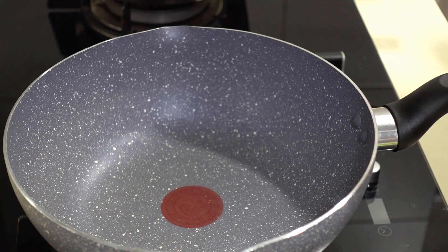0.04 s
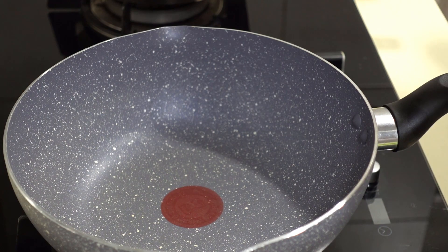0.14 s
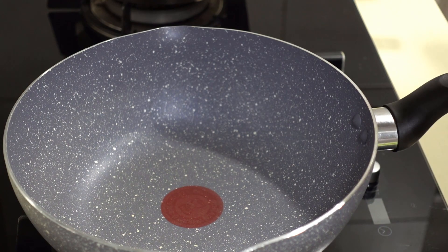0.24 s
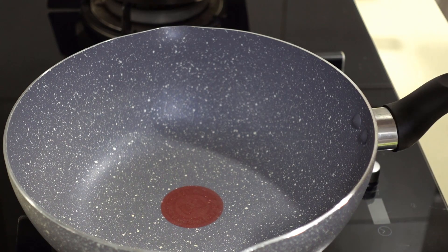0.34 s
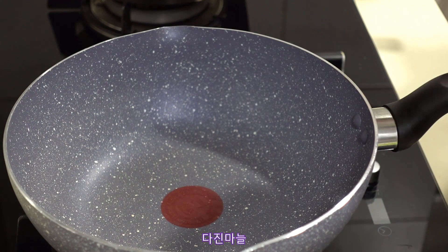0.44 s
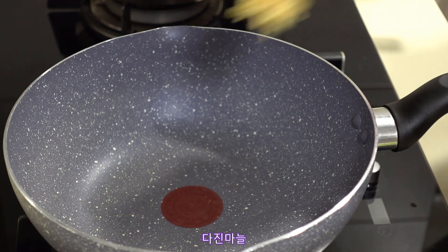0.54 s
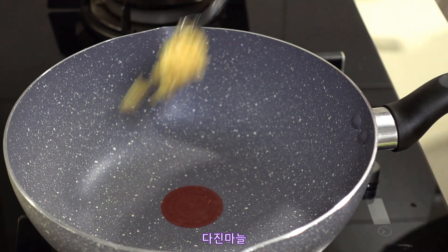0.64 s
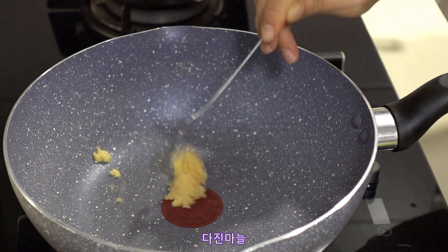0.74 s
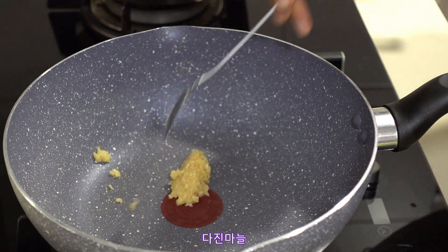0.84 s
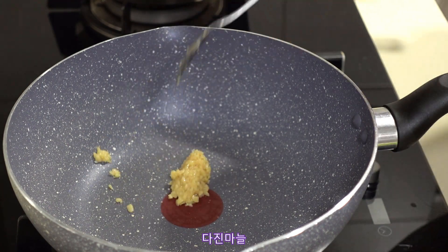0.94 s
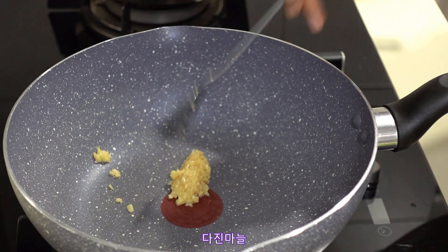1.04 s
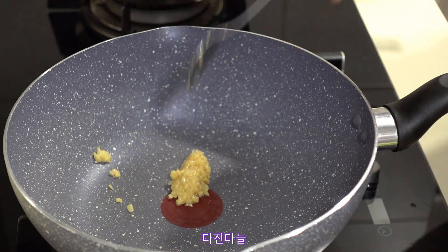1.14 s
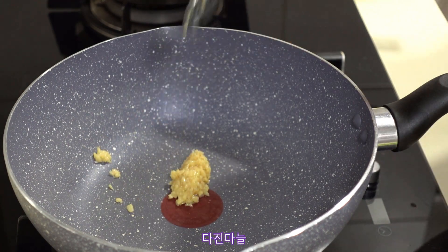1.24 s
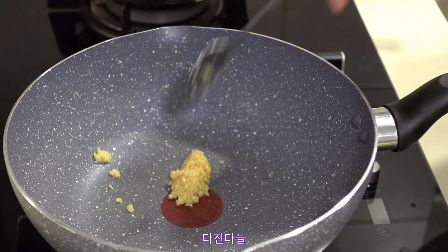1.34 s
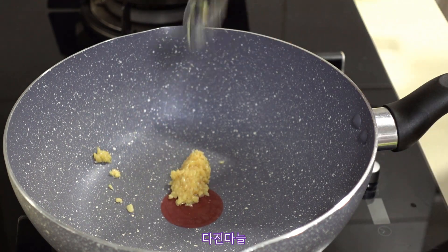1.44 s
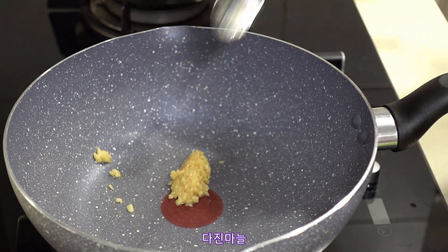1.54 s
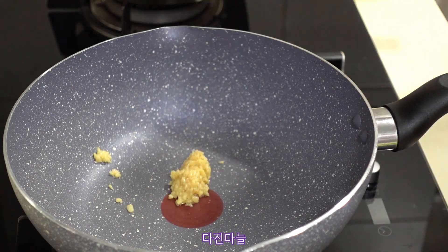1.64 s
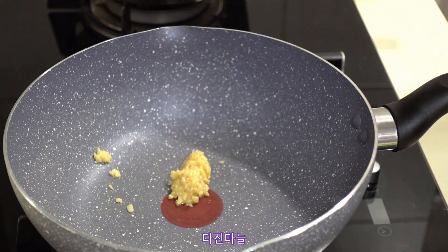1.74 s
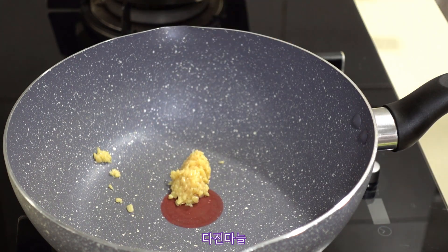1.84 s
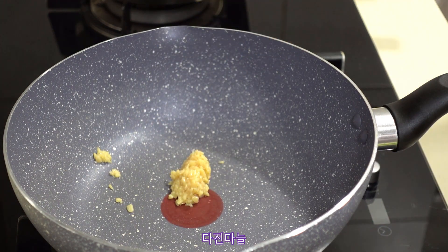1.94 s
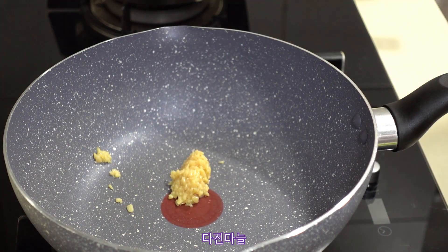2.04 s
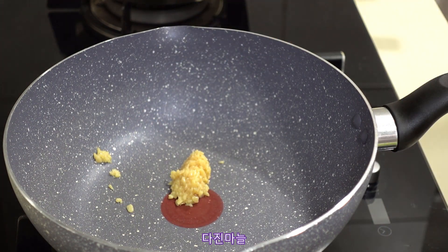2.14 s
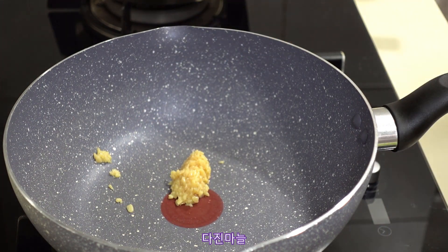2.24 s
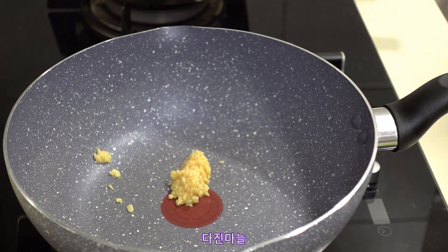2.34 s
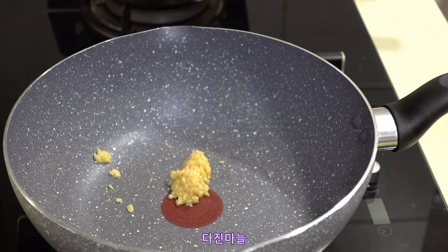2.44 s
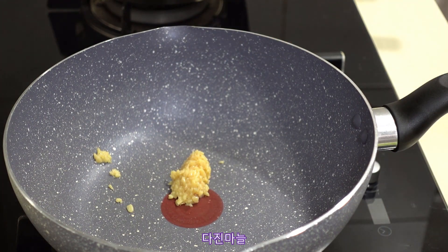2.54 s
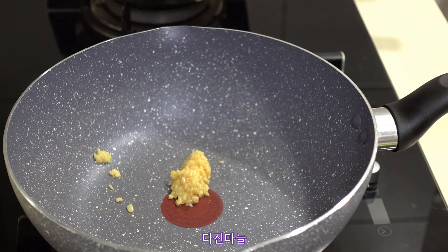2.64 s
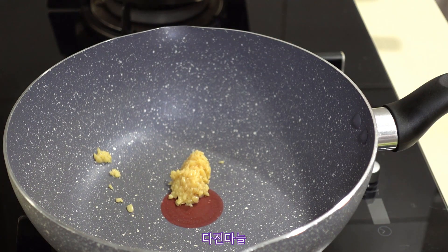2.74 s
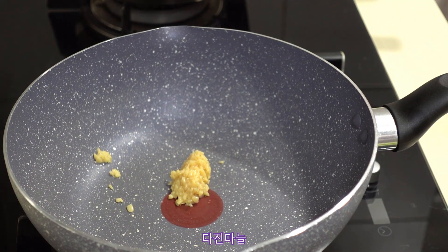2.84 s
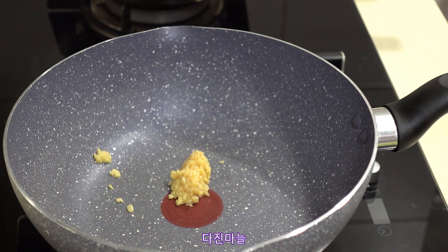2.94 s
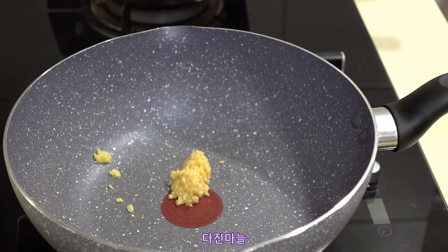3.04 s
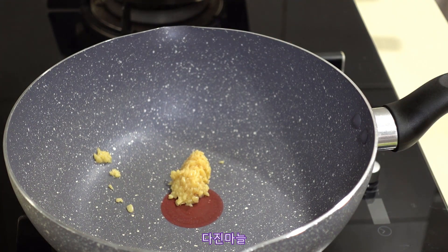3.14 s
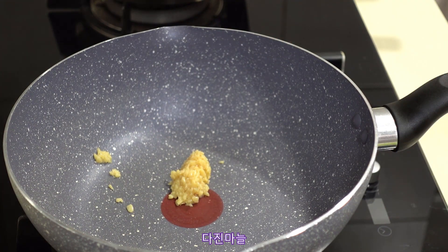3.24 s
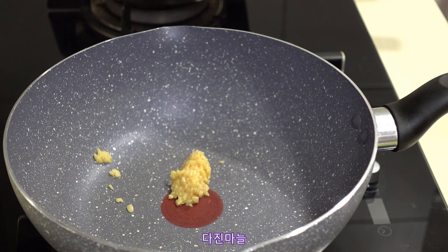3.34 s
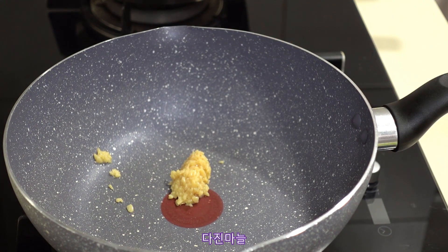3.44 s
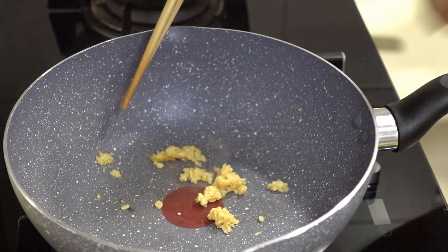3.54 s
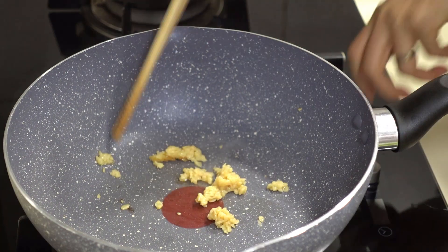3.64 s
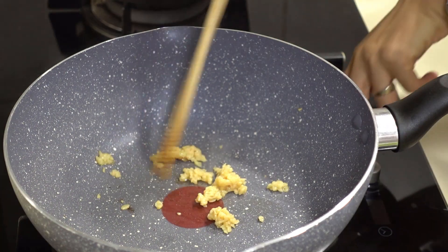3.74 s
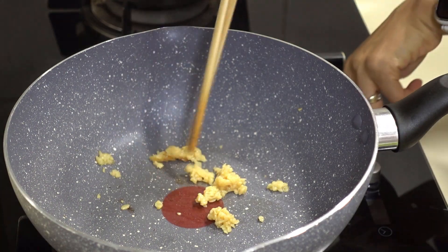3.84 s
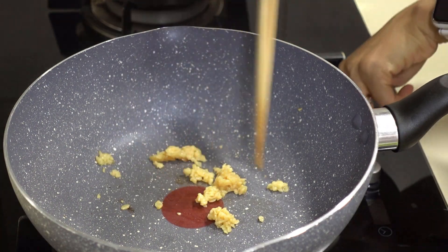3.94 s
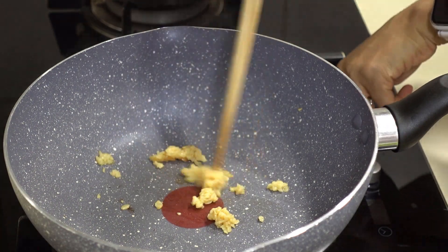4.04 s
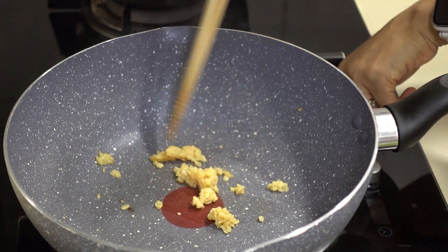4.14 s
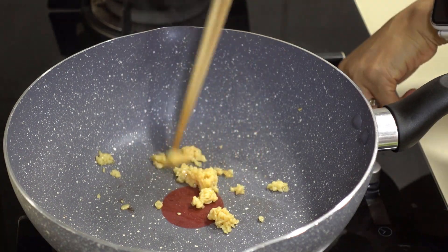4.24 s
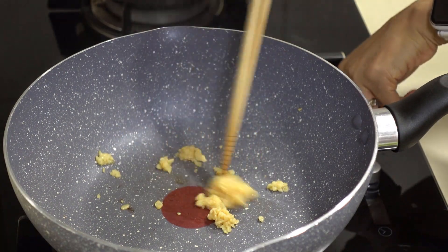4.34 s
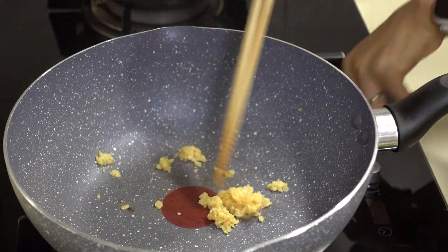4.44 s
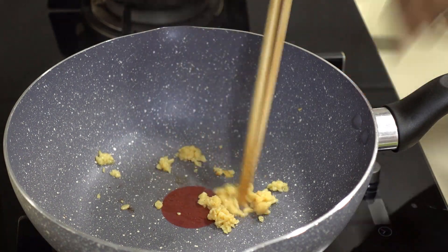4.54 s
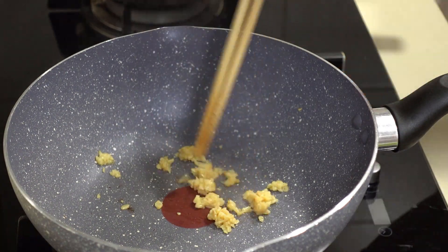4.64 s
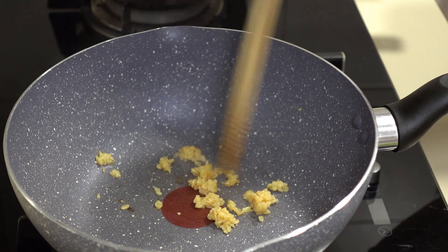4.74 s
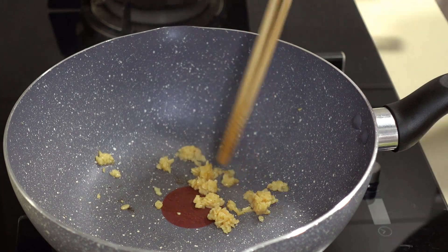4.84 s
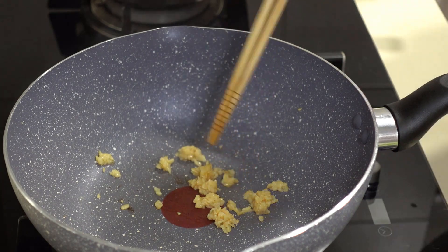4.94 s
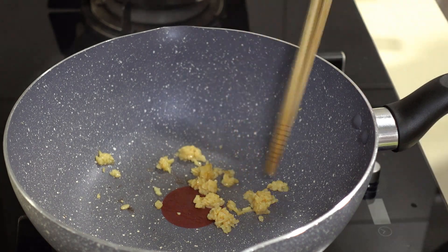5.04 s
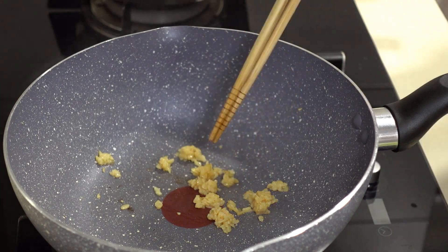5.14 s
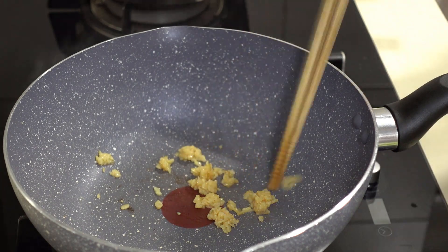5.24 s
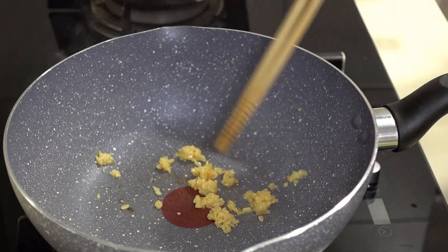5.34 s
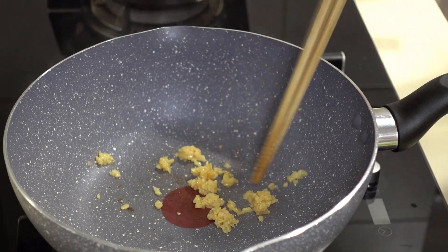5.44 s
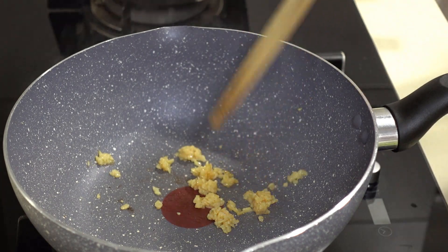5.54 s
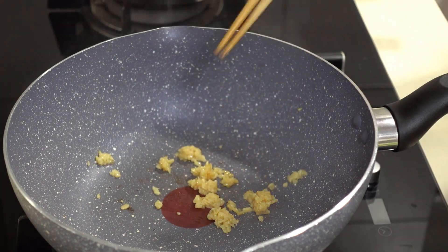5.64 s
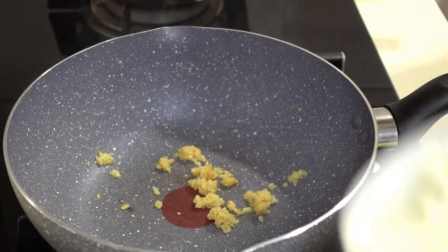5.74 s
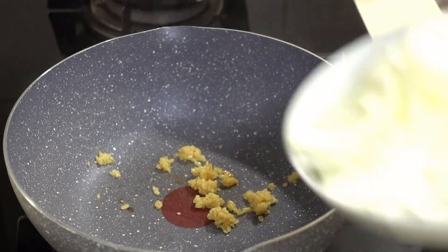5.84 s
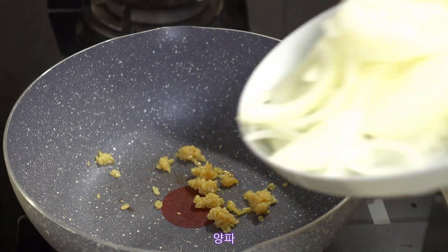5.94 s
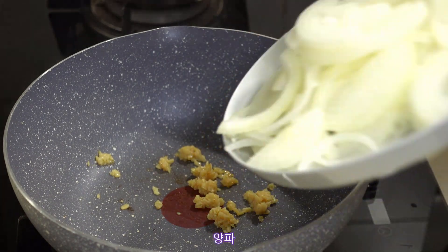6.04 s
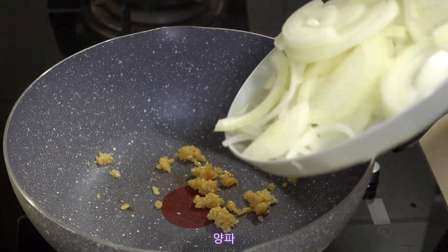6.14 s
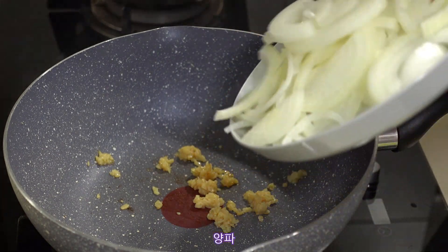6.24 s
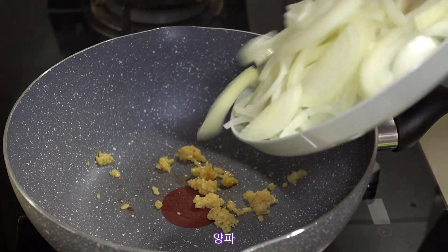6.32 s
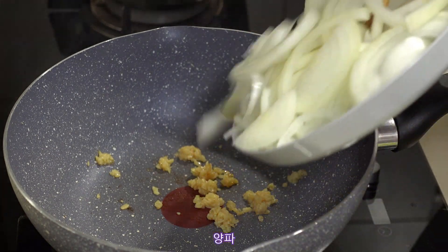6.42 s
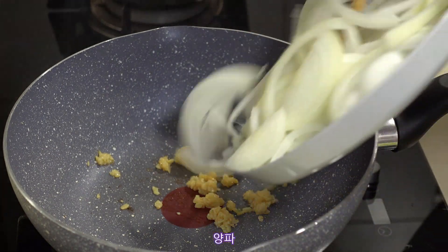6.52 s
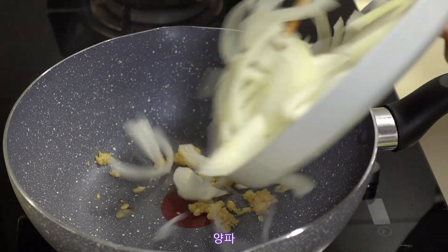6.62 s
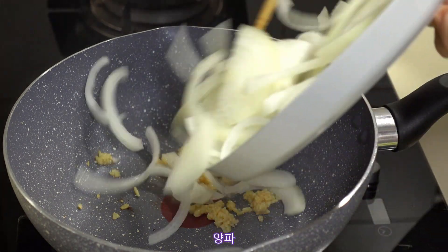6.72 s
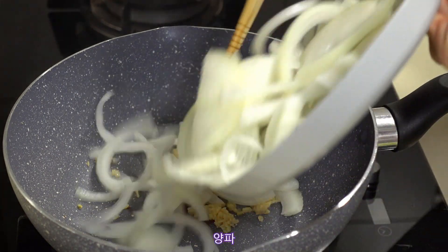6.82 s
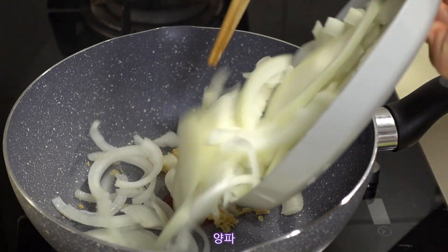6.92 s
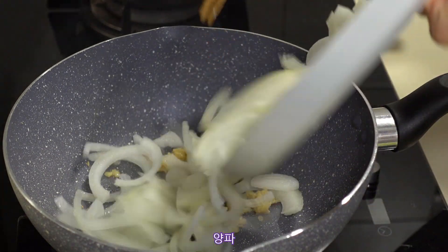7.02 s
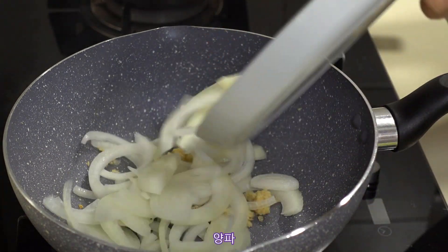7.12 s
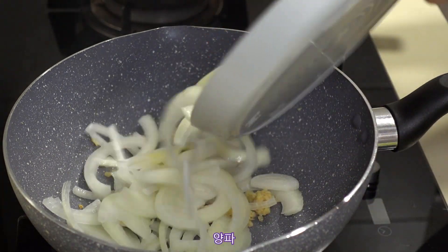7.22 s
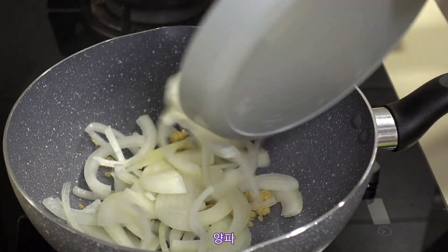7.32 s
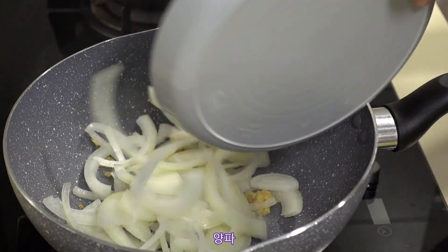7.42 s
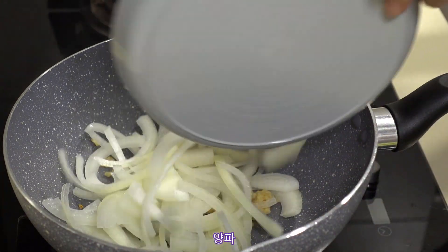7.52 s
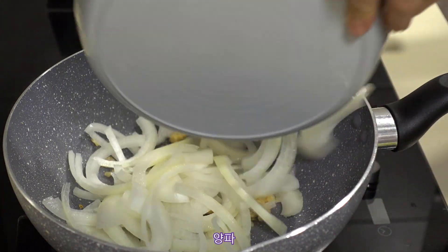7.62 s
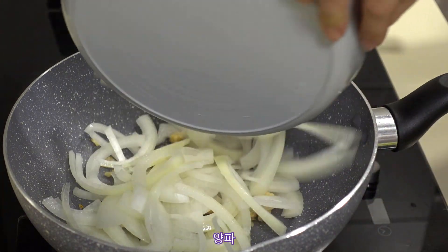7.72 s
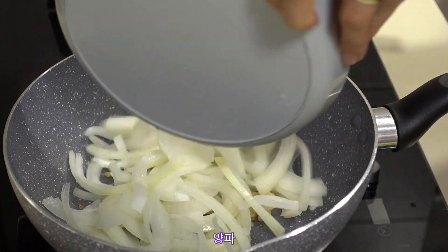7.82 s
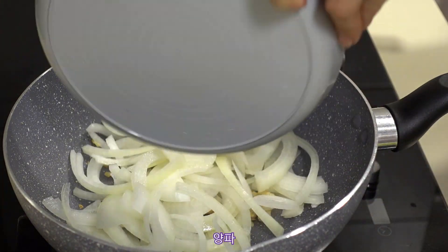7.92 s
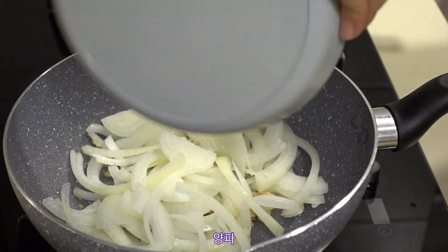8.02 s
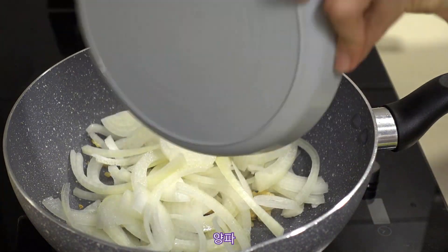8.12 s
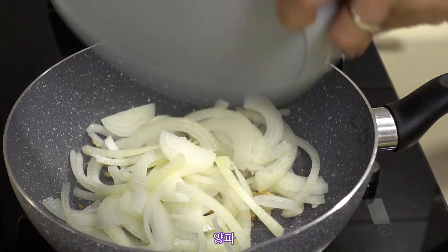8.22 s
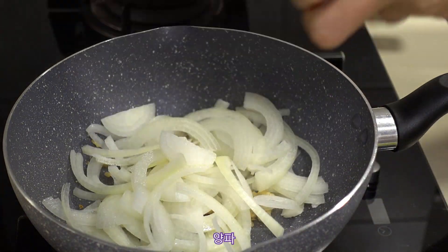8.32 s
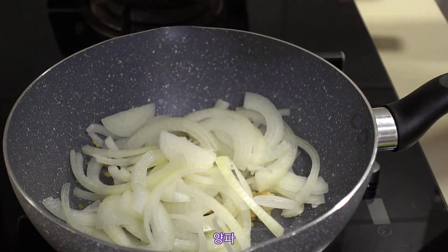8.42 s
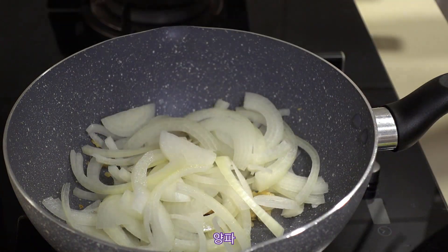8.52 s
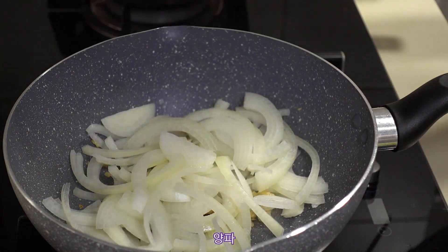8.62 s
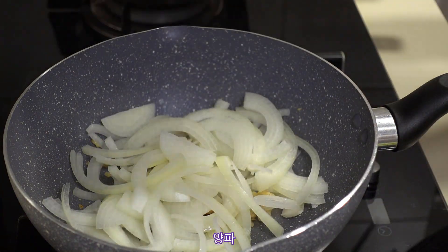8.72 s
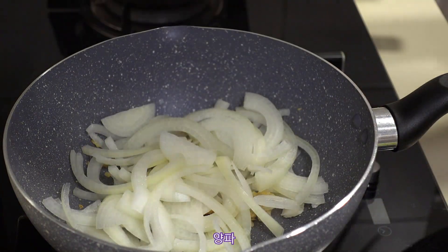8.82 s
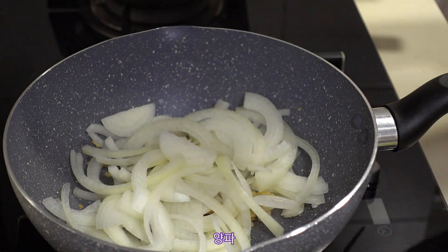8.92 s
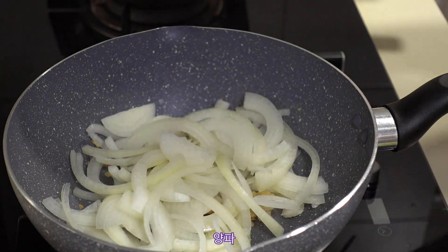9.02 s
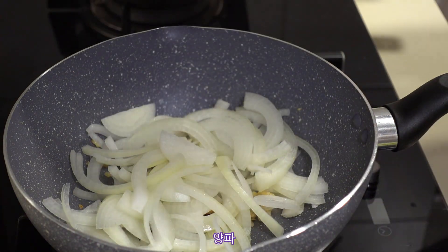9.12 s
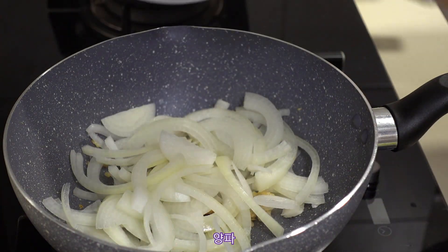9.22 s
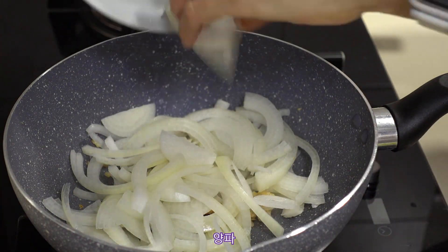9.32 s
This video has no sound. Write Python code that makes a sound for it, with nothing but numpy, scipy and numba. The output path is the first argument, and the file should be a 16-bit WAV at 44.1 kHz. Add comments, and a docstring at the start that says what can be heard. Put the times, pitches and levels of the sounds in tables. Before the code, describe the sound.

A close stereo view of frying in a small, hard-surfaced kitchen. At first only soft flame rumble, room hum and a faint low drone; a spoon ticks at 0.2 s. At about 0.8 s minced garlic lands with a small tap and the oil erupts into dense, bright, crackly fizz, with a thin metallic ring from the pan and a hiss swell near 1.1 s. A crisp tap comes at 2.2 s and a dull bump at 2.7. At 3.5 s a cut makes a momentary dip; the sizzle resumes with less rumble. Chopsticks knock lightly from 3.8, more sharply at 4.8, 5.3 and 5.5 s, with a small steam flare at 4.3. From 6.4 to 7.05 s onion slices tumble in with clustered soft thuds and pan knocks; steam swells and the sizzle turns thicker and wetter, holding steadily. Around 9.0-9.1 s a dish scrapes in short, hollow jerks as frying continues to the end.

```python
"""Minced garlic drops into hot oil in a metal pan and fizzes: thousands of short damped sines a second,
one per steam bubble, also drive the pan's modes. Chopsticks stir; sliced onion slides in from a dish.
Noise bursts make the taps, bumps and spoon tick; gritty noise rings the dish.
Filtered noise gives flame, hum and drone. Two shots are spliced; the second has less rumble."""
import sys
import numpy as np
from scipy import signal
from scipy.fft import rfft, irfft, next_fast_len
from scipy.io import wavfile
from scipy.ndimage import uniform_filter1d
from numba import njit

SR = 44100
rng = np.random.default_rng(int(sys.argv[2]) if len(sys.argv) > 2 else 0)


def ratio_of_db(decibels):
    """Turn decibels (scalar or array-like) into linear amplitude factors; 0 dB maps to 1."""
    return 10 ** (np.asarray(decibels, float) / 20)


def master(y):
    """Save y as 16-bit WAV."""
    cut = np.clip(np.atleast_2d(y).T, -1, 1)
    pcm = np.round(cut * 32767)  # scale
    wavfile.write(sys.argv[1], SR, pcm.astype(np.int16))


N = 413216
TIME_S = np.arange(N) / SR
PADDED = next_fast_len(N + SR // 4)
HZ = np.maximum(np.arange(PADDED // 2 + 1) * SR / PADDED, 1)

# bubble sizes, tiny to large: (lowest pitch [Hz], highest pitch [Hz], rate [bursts/s],
# ring to 1/e [cycles], size scatter [dB], spread between ears [samples])
BUBBLE_SIZES = [(9740, 12550, 16000, 2.3, 2, 0.8), (5240, 10430, 9000, 2.2, 0.4, 1.3),
                (2260, 5490, 6000, 1.8, 0.7, 2.07), (800, 2160, 2500, 3.8, 2, 0.92)]
# the boil; stirring frees juice, onion brings much more: (time [s], vigour [dB], wetness [0-1])
BOIL = [(.73, -50, 0), (.745, -33, 0), (.79, -24.5, 0.15), (.83, -2.5, 0.04), (1.05, -1.5, 0.51),
        (1.7, -1, 0.3), (2.1, -0.5, 0.48), (2.46, -.5, 0.47), (2.55, 0.5, 0.43), (3.9, 0, 0.52),
        (4.3, -0.5, 0.73), (4.65, -1.5, 0.52), (5.45, -1, 0.73), (6.4, -2, 0.74), (6.75, 0.5, 0.73),
        (7.2, 0.5, 0.87), (8.1, 1, 1), (9.37, 1, 0.96)]
# per bubble size, tiny to large: (level in a dry boil [dB], gain when fully wet [dB])
WET_GAIN = [(-28.5, -1), (-33.5, 5.5), (-48, 19), (-55, 2.5)]
# fresh juice flashes to steam: (time [s], level [dB], 1/e half-length [s], centre pitch [Hz])
FLASHES = [(1.09, -32.5, .25, 9500), (4.284, -33, 0.13, 7500), (6.91, -30, 0.41, 7060)]
# pan modes: (frequency [Hz], width [Hz], level [dB])
PAN_MODES = [(815, 33, -3), (951, 9.7, 12), (1815, 14, 7.5), (2083, 8.7, 7), (2520, 34, -5), (2904, 11, 6),
             (3200, 34, 4), (3540, 9.4, 11), (4440, 39, -0.5), (4661, 14, 4.5), (6060, 145, -4.5),
             (6640, 18, -19), (8322, 37, -4), (9840, 200, 1), (11100, 120, -12)]
# drive of taps on the pan: (time [s], level [dB], centre [Hz], decay [s], breadth either side [octaves])
TAPS = [(0.792, -39.5, 1110, 0.018, 0.71), (2.088, -34.5, 3540, 0.02, 0.067),
        (2.182, -25.5, 4000, .006, .9), (2.672, -41.5, 3540, 0.046, 0.055), (2.79, -41, 3540, .02, .05),
        (3.761, -37.5, 950, .008, 0.44), (4.392, -33, 1800, .006, 0.71), (4.819, -22.5, 2650, 0.011, 1.2),
        (5.291, -27, 3200, 0.013, 1.3), (5.491, -30, 2830, 0.016, 1.1), (5.508, -35, 3200, .025, 0.076),
        (5.605, -33, 2740, .006, 0.65), (6.619, -34, 950, 0.014, 0.62), (6.679, -39, 930, .012, .3),
        (6.809, -35.5, 990, 0.022, .6), (6.862, -40, 900, 0.0077, 0.37), (6.909, -28.5, 1180, 0.0057, .7)]
# soft food and hands bumping: (time [s], level [dB], centre [Hz], decay [s])
BUMPS = [(2.596, -50, 170, 0.025), (2.689, -39, 650, 0.016), (4.568, -45, 700, .012),
         (4.695, -37.5, 800, 0.0059), (6.442, -41, 700, 0.025), (6.511, -37, 1700, 0.016),
         (6.543, -35, 1370, 0.014), (6.842, -32, 1550, 0.016), (6.946, -30.5, 1750, 0.017),
         (6.975, -34, 1500, .01), (7.039, -33.5, 1060, 0.021), (8.992, -42, 595, 0.0097)]
# the empty dish is pushed onto the counter: (peak time [s], level [dB], rise [s], fade [dB/s])
SHOVES = [(8.996, -28.5, 0.0069, 133), (9.084, -28.5, 0.031, 150), (9.132, -39, .008, 250)]
# dish modes: (frequency [Hz], width [Hz], level [dB])
DISH_MODES = [(388, 49, 1), (467, 11, 10), (753, 30, 5.5), (930, 94, 6), (1166, 92, 11), (1440, 120, 3),
              (2240, 570, 4.5)]
# the spoon's tick: (time [s], level [dB])
SPOON_TICK = [(0.211, -33.5)]
# spoon partials: (frequency [Hz], relative level [dB], T60 [s])
SPOON_PARTIALS = [(980, 1, 0.077), (2110, -18, .1), (3580, -18, 0.18), (4470, -19, 0.077), (7219, -18, .1),
                  (7700, -21, .06), (9055, -25, .1), (10600, -11, 0.18)]
# broad spectrum of flame and hum: (frequency [Hz], relative density [dB])
KITCHEN_SPECTRUM = [(18, -57), (30, -24), (131, -8.5), (303, 3.5), (449, 3), (962, 6.5), (1540, -7),
                    (2410, -6), (2900, -14.5), (3580, -14), (4910, -26), (9220, -39), (12000, -45),
                    (16000, -51)]
# resonances in the hum: (frequency [Hz], width [Hz], level [dB])
HUM_MODES = [(464, 8.4, 12.5), (910, 500, 1.5), (1380, 20, 0), (2100, 110, -44), (2360, 51, 0),
             (3300, 19, -33), (3500, 46, 2), (3950, 36, -29), (4200, 120, -6), (5560, 90, -26),
             (8100, 58, -19), (9200, 110, -17)]
# left-right correlation of the hum: (frequency [Hz], correlation [0-1])
HUM_CORRELATION = [(30, .6), (130, 0.82), (500, 1), (2000, 0.7), (8000, 0)]
# low wavering drone: (frequency [Hz], width [Hz], relative level [dB])
DRONE_MODES = [(95.3, 5, -9), (144.6, 4.7, 0)]
# microphone response: (frequency [Hz], gain [dB])
MIC_RESPONSE = [(20, -33), (45, -8), (90, -3), (500, -7.5), (1200, -1), (2000, -4), (3000, -3.5), (4500, 0),
                (6000, -1.5), (8000, 3), (10000, 1), (13000, 4), (15000, 16), (16000, 7.5)]
# level of left over right: (frequency [Hz], difference [dB])
LEFT_MINUS_RIGHT = [(60, -0.5), (110, -4), (200, 2.5), (380, -2.5), (700, 0.0), (1290, 0.0), (2380, -0.5),
                    (4400, 0.5), (8120, -1.0), (11500, -2.5), (15000, -1.5)]
# phase of left ahead of right: (frequency [Hz], lead [rad])
LEFT_LEADS = [(30, 0), (2000, 0), (3400, 0.3), (9600, 0.3), (10400, 1.6), (11300, 4.4), (12000, 5.6),
              (16500, 5.9)]
# cancellations by nearby surfaces: (frequency [Hz], width [Hz], depth before a 0.95 cap [0-1])
DIPS = [(287, 38, 1), (562, 25, 0.76), (1038, 265, 0.59), (1221, 37, 1)]

SPLICE_S, SPLICE_DB, SPLICE_FADE_S = 3.496, -26, 0.03
# pan ring in each shot: food in one heap, then spread out; it damps as it softens
RING_DB, RING_DAMP_DB_PER_S = (8, -4.5), 1.6
FLASH_SPREAD, FLASH_CYCLES = 0.075, 2.3  # share of the pitch either side; ring of one bubble to 1/e
TOUCH_DAMPING = 1.5  # what strikes the pan rests on it and widens its modes by this factor
KNOCK = 0.4  # gain of the tap's drive heard dry
RUMBLE_DB, HUM_DB = (-57.5, -61.5), (-46.5, -48)  # flame below 300 Hz, hum above; per shot, before sinking
RUMBLE_SINK_DB, HUM_SINK_DB, SINK_S = -2.5, -4.5, 0.13  # once the fizz has begun
DRONE_DB = (-64, -92)  # per shot
ROOM_T60_S, ROOM_DB = 0.15, -13


def unit(x):
    """Scale to rms 1."""
    return x / np.sqrt(np.mean(x ** 2))


def over_hz(table):
    """A (frequency, value) table on the transform's frequencies, linear in log frequency."""
    hz, value = np.transpose(table)
    return np.interp(np.log(HZ), np.log(hz), value)


def over_time(table):
    """The columns of a curve, sample by sample."""
    s, *columns = np.transpose(table)
    return [np.interp(TIME_S, s, column) for column in columns]


def shot(first, second):
    """One value before the splice, another after."""
    return np.where(TIME_S < SPLICE_S, first, second)


def shape(x, gain):
    """Filter by a response given per frequency."""
    return irfft(rfft(x, PADDED) * gain, PADDED)[..., :N]


def resonances(modes):
    """Summed response of damped modes, alternate ones inverted."""
    total = 0
    for k, (f, width_hz, db) in enumerate(modes):
        total = total + (-1) ** k * ratio_of_db(db) / (1 + 1j * (HZ ** 2 - f ** 2) / (HZ * width_hz))
    return total


def walk(rate_hz):
    """Random levels held 1 / rate_hz and slewed twice."""
    hold = int(SR / rate_hz)
    steps = np.repeat(rng.standard_normal(N // hold + 1), hold)
    return uniform_filter1d(uniform_filter1d(steps, hold), hold)[:N]


def burst(s, db, hz, decay_s, octaves, click):
    """A first sharp contact, then a short decaying push of noise around one pitch."""
    t = np.arange(4096) / SR
    band_hz = [hz / 2 ** octaves, min(hz * 2 ** octaves, SR / 2.2)]
    sos = signal.butter(2, band_hz, "band", fs=SR, output="sos")
    push = rng.standard_normal(len(t)) * np.exp(-t / decay_s)
    push[0] = click * np.sqrt(decay_s * SR)
    x = signal.sosfilt(sos, push)
    early_rms = np.sqrt(np.mean(x[:int(decay_s * SR)] ** 2))
    start = int(s * SR)
    out = np.zeros(N + len(t))
    out[start:start + len(t)] = ratio_of_db(db) * x / early_rms
    return out[:N]


def sizzle():
    """Four bubble sizes boil up together in patches; wetness shifts their balance; the bursts ring the pan."""
    patches_db = 0.77 * walk(12) + 0.71 * walk(40)
    vigour_db, wet = over_time(BOIL)
    fizz = flashes() * ratio_of_db(np.minimum(vigour_db, 0))
    for (dry_db, gain_db), size in zip(WET_GAIN, BUBBLE_SIZES):
        level_db = vigour_db + dry_db + wet * gain_db
        fizz = fizz + ratio_of_db(level_db + patches_db + 0.5 * walk(18)) * bubbles(*size)
    fizz = shape(fizz, 1 / (1 + (500 / HZ) ** 4))  # small bubbles radiate no bass
    start_s = BOIL[0][0]
    ring_db = shot(*RING_DB) - RING_DAMP_DB_PER_S * (TIME_S - shot(start_s, SPLICE_S))
    ring = ratio_of_db(ring_db) * shape(fizz.mean(axis=0), resonances(PAN_MODES))
    return (fizz + ring) * (TIME_S > start_s)


def bubbles(low_hz, high_hz, rate, cycles, scatter_db, spread):
    """Bursts at random moments and places; a few are much larger than the rest."""
    count = int(rate * N / SR)
    moment, pitch, rank = rng.random((count, 3)).T
    pan, lag = rng.standard_normal((count, 2)).T
    turn = 2 * np.pi * (low_hz + (high_hz - low_hz) * pitch) / SR  # radians per sample
    decay = turn / (2 * np.pi * cycles)
    size = ratio_of_db(-scatter_db * np.log(1.004 - rank))
    ear = ratio_of_db(0.89 * pan) * np.exp(0.5j * turn * spread * lag)  # place in the pan: level and lag
    length = np.minimum(np.log(200) / decay, 4000).astype(np.int64)
    start = (moment * N).astype(np.int64)
    return unit(grains(start, np.exp(1j * turn - decay), size * ear, size / ear, length))


@njit
def grains(start, pole, left, right, length):
    """Each grain is a damped sine with its own size and phase in each ear."""
    out = np.zeros((2, N + 4096))
    for g in range(len(start)):
        z = 1. + 0j
        for i in range(start[g], start[g] + length[g]):
            out[0, i] += (z * left[g]).imag
            out[1, i] += (z * right[g]).imag
            z *= pole[g]
    return out[:, :N]


def flashes():
    """Swells of narrower hiss where wet food first meets the oil: bubbles of nearly one size."""
    total = 0
    for s, db, length_s, hz in FLASHES:
        swell = ratio_of_db(db) * np.exp(-((TIME_S - s) / length_s) ** 2)
        low_hz, high_hz = hz * (1 - FLASH_SPREAD), hz * (1 + FLASH_SPREAD)
        total = total + swell * bubbles(low_hz, high_hz, 3000, FLASH_CYCLES, 1.6, 1.05)
    return total


def taps():
    """Sticks and falling slices strike the pan: its damped modes with a little dry knock."""
    push = sum(burst(*row, click=0.9) for row in TAPS)
    touched = [(f, width_hz * TOUCH_DAMPING, db) for f, width_hz, db in PAN_MODES]
    return shape(push, ratio_of_db(5) * resonances(touched) + KNOCK)


def bumps():
    """Dull contacts with no ring: short bursts of noise alone."""
    return sum(burst(*row, octaves=0.95, click=0.4) for row in BUMPS)


def dish():
    """Jerky friction, noise of uneven level, rings the dish."""
    grit = rng.standard_normal(N) * ratio_of_db(1.7 * walk(90))
    push = 0
    for s, db, rise_s, fade_db_per_s in SHOVES:
        rise = np.clip(1 + (TIME_S - s) / rise_s, 0, 1)
        push = push + rise * ratio_of_db(db - fade_db_per_s * np.maximum(TIME_S - s, 0))
    return push * unit(shape(grit, resonances(DISH_MODES)))


def spoon():
    """A metal spoon ticks against a jar: decaying partials and a noise contact."""
    (s, level_db), = SPOON_TICK
    t = np.maximum(TIME_S - s, 0)
    ring = sum(ratio_of_db(db) * np.sin(2 * np.pi * f * t) * 1000. ** (-t / t60_s) for f, db, t60_s in SPOON_PARTIALS)
    return ratio_of_db(level_db) * ring + burst(s, level_db - 13, 2700, 0.019, 0.81, 0.33)


def room(x):
    """Hard kitchen surfaces return a short diffuse tail, different in each ear."""
    t = np.arange(SR // 2) / SR
    tail = rng.standard_normal((2, len(t))) * 1000. ** (-t / ROOM_T60_S) * (t > 0.002)
    tail = tail / np.sqrt(np.sum(tail ** 2, axis=1, keepdims=True))
    return x + ratio_of_db(ROOM_DB) * signal.fftconvolve(x, tail, axes=1)[:, :N]


def kitchen():
    """Flame roar and room hum: coloured noise whose mid/side balance sets the likeness of the ears."""
    alike = np.clip(over_hz(HUM_CORRELATION), 0, 1)
    colour = ratio_of_db(over_hz(KITCHEN_SPECTRUM)) + np.abs(resonances(HUM_MODES))
    mid, side = rng.standard_normal((2, N))
    mid = shape(mid, colour * np.sqrt(1 + alike))
    side = shape(side, colour * np.sqrt(1 - alike))
    both = np.array([mid + side, mid - side])
    rumble = shape(both, 1 / (1 + (HZ / 300) ** 6))
    sunk = 1 - np.exp(-np.maximum(TIME_S - BOIL[2][0], 0) / SINK_S)
    rumble_db = shot(*RUMBLE_DB) + RUMBLE_SINK_DB * sunk + 1.6 * walk(12)
    hum_db = shot(*HUM_DB) + HUM_SINK_DB * sunk + 1.6 * walk(2.96)
    return ratio_of_db(rumble_db) * unit(rumble) + ratio_of_db(hum_db) * unit(both - rumble)


def drone():
    """Narrow noise around low pitches, perhaps a fan motor."""
    return ratio_of_db(shot(*DRONE_DB)) * unit(shape(rng.standard_normal(N), resonances(DRONE_MODES)))


def scene():
    """Everything at the stove sounds in the room; the hum is already diffuse."""
    return room(sizzle() + taps() + bumps() + dish() + spoon()) + kitchen() + drone()


def low_pass(x):
    """Removes everything above the highest recorded frequency."""
    return signal.sosfilt(signal.butter(12, 15740, fs=SR, output="sos"), x)


def record(dry):
    """Microphone colour, balance and lag between ports; the second shot fades in quickly at the splice."""
    lean = ratio_of_db(over_hz(LEFT_MINUS_RIGHT) / 2) * np.exp(0.5j * over_hz(LEFT_LEADS))
    dips = np.ones(len(HZ))
    for f, width_hz, depth in DIPS:
        dips = dips * (1 - min(depth, 0.95) / (1 + (2 * (HZ - f) / width_hz) ** 2))
    x = shape(dry, dips * ratio_of_db(over_hz(MIC_RESPONSE)) * np.array([lean, 1 / lean]))
    fade = np.clip(1 - (TIME_S - SPLICE_S) / SPLICE_FADE_S, 0, 1) * (TIME_S >= SPLICE_S)
    mix = x * (1 - fade * (1 - ratio_of_db(SPLICE_DB)))
    return low_pass(mix)


dry = scene()
out = record(dry)
master(out)
```